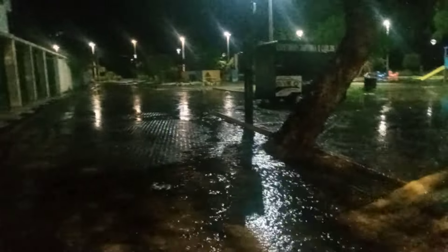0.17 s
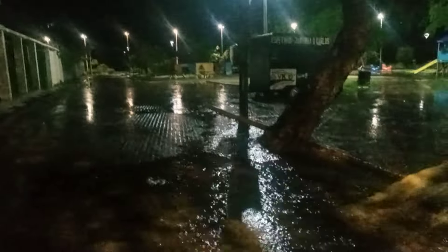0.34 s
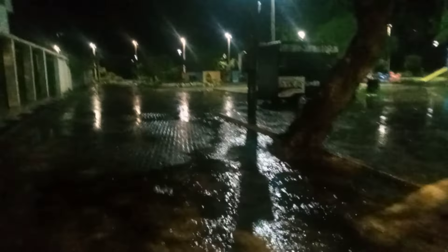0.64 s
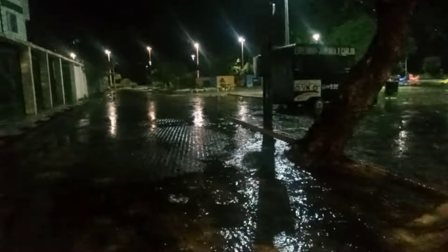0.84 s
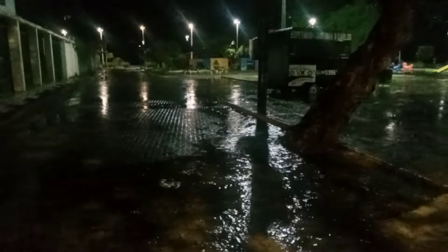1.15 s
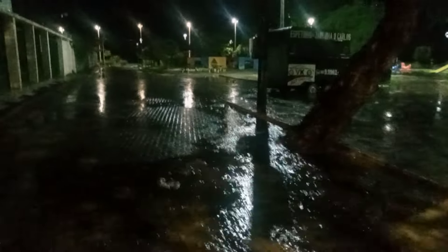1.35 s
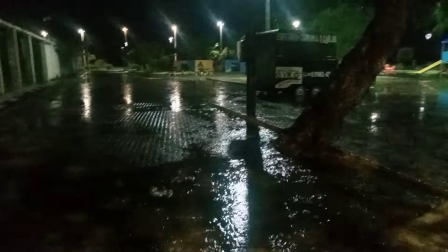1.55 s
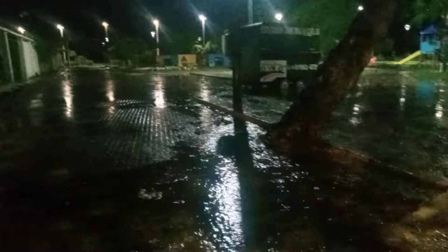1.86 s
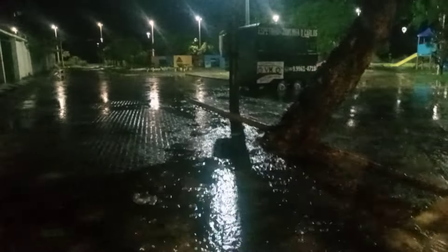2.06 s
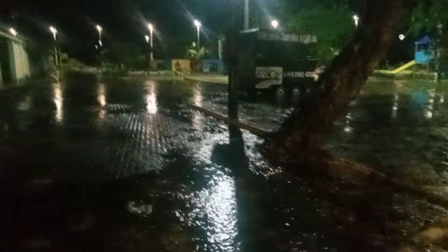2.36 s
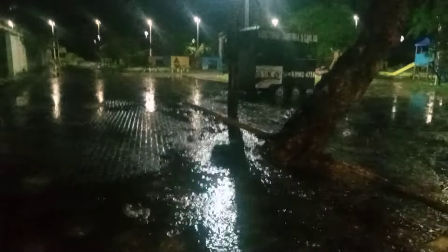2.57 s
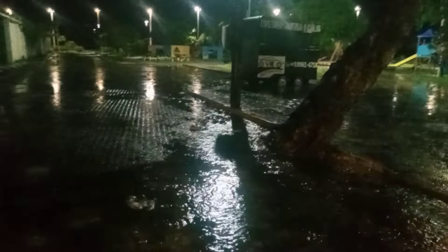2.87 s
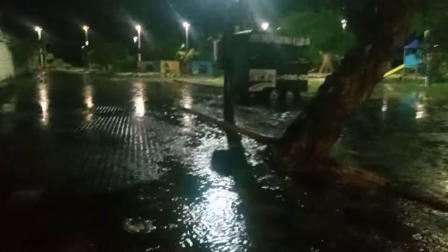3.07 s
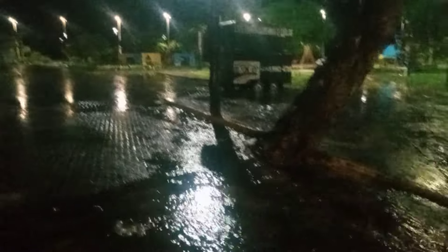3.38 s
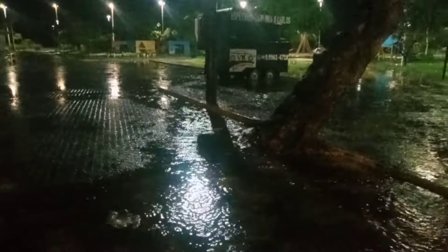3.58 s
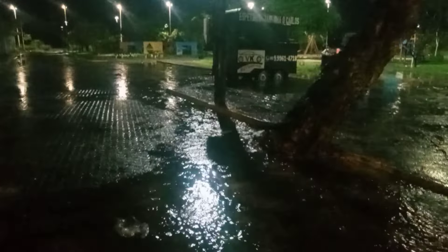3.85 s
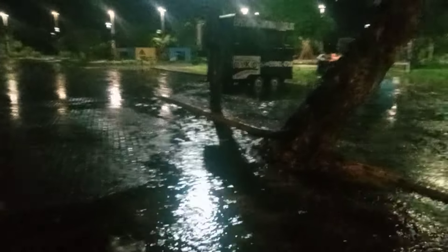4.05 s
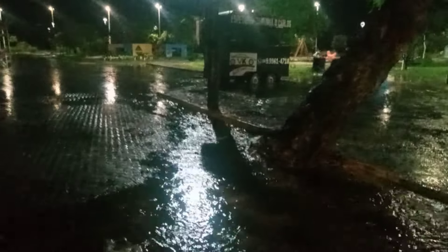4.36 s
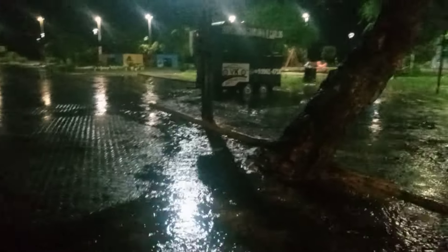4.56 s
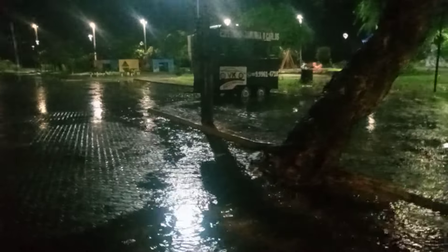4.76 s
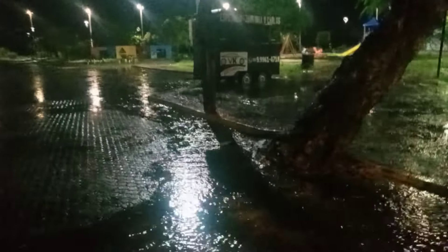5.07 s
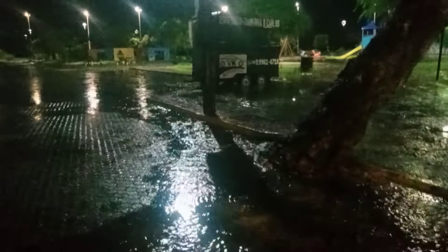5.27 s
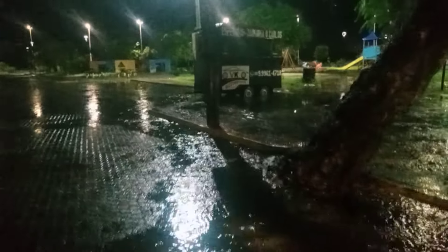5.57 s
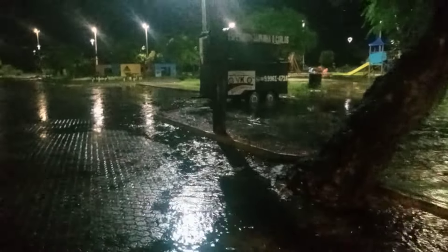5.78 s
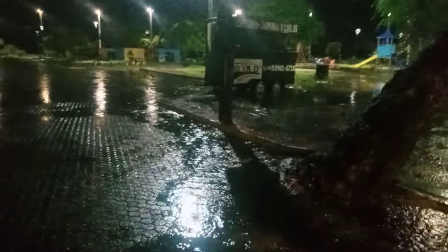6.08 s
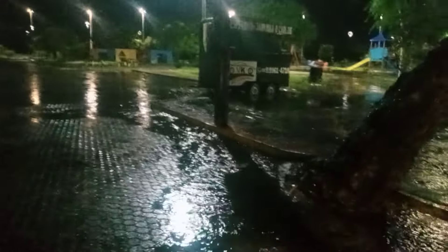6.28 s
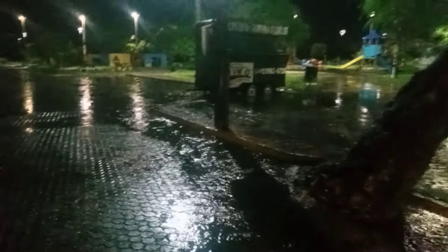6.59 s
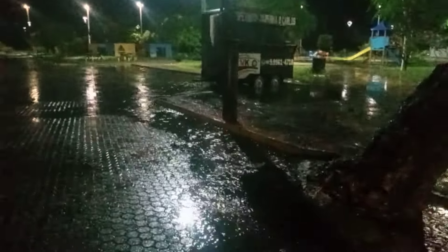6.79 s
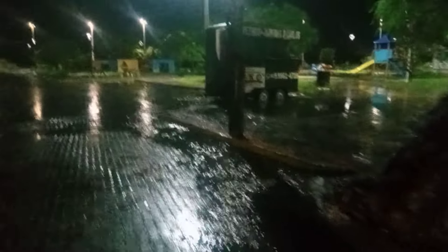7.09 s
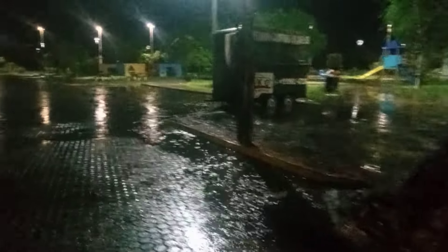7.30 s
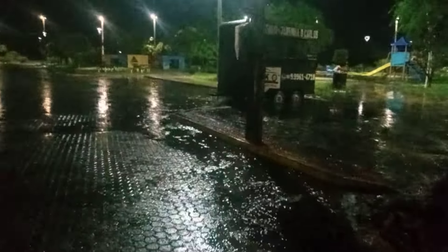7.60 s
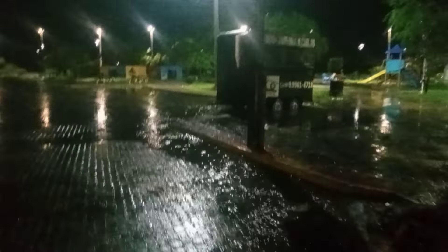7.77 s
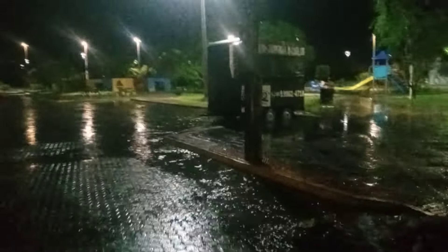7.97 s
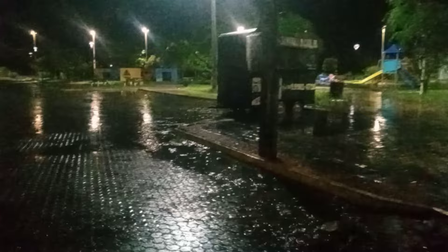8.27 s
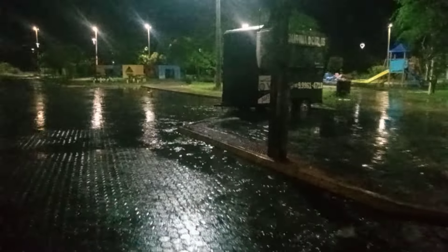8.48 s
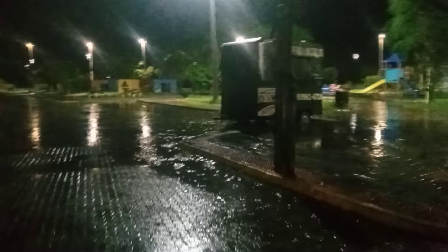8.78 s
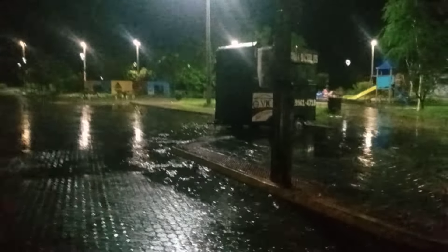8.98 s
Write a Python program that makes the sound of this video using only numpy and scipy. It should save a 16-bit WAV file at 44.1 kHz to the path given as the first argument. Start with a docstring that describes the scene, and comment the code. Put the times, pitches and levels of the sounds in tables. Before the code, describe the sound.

Close under an umbrella at night, heavy raindrops thud and slap irregularly on taut cloth, with lighter patter between. Behind, steady rain hisses and trickles on wet paving and puddles. Slow steps splash in shallow water, more often after seven seconds, as the overhead drumming thins out and stops. Small drips plink with rising pitch, and nearby droplets crack brightly.

```python
"""Heavy drops thud on the taut cloth of an umbrella just overhead, among many lighter ones, in steady rain.
Each drop is a filtered slap with an echo, scattered noise, ringing panel modes and a noise tick.
Slow steps splash in standing water: swelling and fading bursts of bubble and spray grains.
Drips plink as damped sines of rising pitch, and close droplets crack as decaying noise.
Behind, the street hisses as filtered noise and grains; one low rumble passes briefly."""
import sys
import numpy as np
from scipy import signal
from scipy.fft import rfft, irfft, next_fast_len
from scipy.io import wavfile
from scipy.ndimage import map_coordinates

SR = 44100
rng = np.random.default_rng(int(sys.argv[2]) if len(sys.argv) > 2 else 0)


def transcribe(u):
    """Save the signal u as a 16-bit wav file named by the first command-line argument.

    u: samples, shape (n,) or (channels, n), limited to [-1, 1]; the rate is SR.
    q: integer samples, one column per channel.
    """
    v = np.clip(np.atleast_2d(u).T, -1, 1)
    q = np.round(v * 32767).astype(np.int16)
    wavfile.write(sys.argv[1], SR, q)


N = 403074
TOP_HZ = 15800  # upper band limit


def amp(db):
    """Decibels to gain."""
    return 10 ** (np.asarray(db) / 20)


def unit(x):
    """Scale to rms 1."""
    return x / np.sqrt(np.mean(x ** 2) + 1e-20)


def gain(points, hz):
    """Gain of (frequency [Hz], level [dB]) points joined on a log frequency axis."""
    point_hz, point_db = np.transpose(points)
    return amp(np.interp(np.log(hz + 1), np.log(point_hz + 1), point_db))


def curves(rows):
    """One value per sample for each column after the time."""
    knot_s, *columns = np.transpose(rows)
    return [np.interp(np.arange(N) / SR, knot_s, column) for column in columns]


def wobble(knots_per_s):
    """Smooth random curve through normally distributed knots."""
    knots = rng.standard_normal(int(N * knots_per_s / SR) + 4)
    return map_coordinates(knots, [np.arange(N) * knots_per_s / SR])


def filtered(x, response):
    """Multiply the spectrum of x by a response of frequency."""
    size = next_fast_len(len(x) + SR // 5)
    spectrum = rfft(x, size) * response(np.fft.rfftfreq(size, 1 / SR))
    return irfft(spectrum, size)[:len(x)]


def coloured(x, points):
    """Filter x by the given spectrum, then scale to rms 1."""
    return unit(filtered(x, lambda hz: gain(points, hz)))


def causal(gains):
    """Minimum-phase responses, by folding the cepstrum, from rows of gains."""
    cepstrum = irfft(np.log(np.maximum(gains, 1e-6)))
    half = cepstrum.shape[-1] // 2
    cepstrum[..., 1:half] *= 2
    cepstrum[..., half + 1:] = 0
    return np.exp(rfft(cepstrum))


def placed(start_s, sounds):
    """Sum rows of samples, each from its start time."""
    first = np.round(np.maximum(start_s, 0) * SR).astype(int)
    at = first[:, None] + np.arange(sounds.shape[1])
    return np.bincount(at.ravel(), sounds.ravel(), N)[:N]


def grains(count, pitch_hz, log_scatter, cycles, spread_db, size):
    """Tiny impacts and bubbles: damped sines at random times, a few much nearer than the rest."""
    when, near, sign = rng.random((count, 3)).T
    hz = pitch_hz * np.exp(log_scatter * rng.standard_normal((count, 1)))
    turns = np.clip(hz, 300, TOP_HZ) * np.arange(size) / SR
    strength = amp(-spread_db * np.log(1 - .99 * near)) * np.sign(sign - .5)
    rings = np.sin(2 * np.pi * turns) * np.exp(-turns / cycles)
    return unit(placed(when * N / SR, strength[:, None] * rings))


# slap spectrum at SLAP_HZ pitch: (frequency [Hz], relative level [dB per Hz])
SLAP_SPECTRUM = [(30, -23), (100, -48), (220, -8.5), (420, 3.5), (620, 1), (900, 1.5), (1350, -7),
                 (1900, -7.5), (2700, -20), (4000, -20), (6000, -22), (16000, -81)]
# spectrum scattered by the cloth: (frequency [Hz], relative level [dB per Hz])
CREASE_SPECTRUM = [(40, -37), (150, 15), (350, 16.5), (1000, 1.5), (2000, 10.5), (4000, -1), (6500, -6.5),
                   (16000, -27)]
# cloth panel modes at mean tautness: (frequency [Hz], relative level [dB], t60 [s])
PANEL_MODES = [(140, -42, .09), (270, -27, .07), (335, -23, .08), (380, -24, .085), (430, -21, .1),
               (540, -25, .055), (690, -27, .045), (825, -17, .03), (950, -20, .025), (1085, -23, .025)]
SLAP_HZ, SLAP_S = 1000, .004  # reference pitch; span over which a slap has rms 1
TICK_T60_S = .011


def cloth(start_s, level_db, pitch_hz, ring_db, crease_db, crease_t60_s, lag_hz, rib_db, rib_s, tick_db,
          size=3072):
    """Drops on the canopy: a slap, its return from the ribs, scattered waves, ringing panels and a wet tick."""
    t, hz, count = np.arange(size) / SR, np.fft.rfftfreq(size, 1 / SR), len(start_s)
    # every spot of the canopy has its own colour
    ripples = np.cos(np.pi * np.outer(np.arange(3, 9), np.log(hz + 200) / np.log(20)))
    spot = amp(1.8 * rng.standard_normal((count, len(ripples))) @ ripples)

    # smaller, faster drops slap shorter and higher; all-pass lag delays the lows
    lag = (lag_hz - 1j * hz) / (lag_hz + 1j * hz)
    slap_gain = spot * gain(SLAP_SPECTRUM, hz * SLAP_HZ / pitch_hz[:, None])
    slap = irfft(causal(slap_gain) * lag ** 2)
    slap *= np.sqrt(SLAP_S * SR) / np.linalg.norm(slap, axis=1, keepdims=True)

    trip_s = rib_s * (.5 + rng.random((count, 1)))
    echo = amp(rib_db) * irfft(rfft(slap) * np.exp(-2j * np.pi * hz * trip_s))

    noise = rng.standard_normal(count * size)
    scattered = coloured(noise, CREASE_SPECTRUM).reshape(count, size)
    scattered *= amp(crease_db - 60 * t / crease_t60_s) * (1 - np.exp(-t / 0.00033))

    # each blow weights the modes at random; tautness scales pitch and decay rate
    mode_hz, mode_db, t60_s = np.transpose(PANEL_MODES)[:, :, None]
    modes = amp(ring_db + mode_db - 60 * t / t60_s) * np.sin(2 * np.pi * mode_hz * t)
    blows = rng.standard_normal((count, len(PANEL_MODES))) @ modes
    tautness = np.exp(.1 * rng.standard_normal(count))
    ring = np.array([np.interp(t * k, t, blow, right=0) for k, blow in zip(tautness, blows)])

    # the burst varies with the film of water that the drop meets
    burst_db = tick_db - 12 * rng.random((count, 1))
    tick = amp(burst_db - 60 * t / TICK_T60_S) * rng.standard_normal((count, size))

    drum = placed(start_s, amp(level_db)[:, None] * (slap + echo + scattered + ring + tick))
    # low-frequency air slips round the open canopy and radiates little
    highpass = signal.butter(2, 140, "highpass", fs=SR, output="sos")
    return signal.sosfilt(highpass, drum)


# heaviest drops on the cloth: (time [s], slap level [dB], slap pitch [Hz])
HEAVY_DROPS = [(0.0589, -23, 980), (0.162, -28, 1150), (0.1923, -26.0, 1180), (0.245, -24.5, 1000),
               (0.3045, -24, 750), (0.5024, -23.5, 860), (0.5386, -24.5, 1400), (0.822, -19.0, 840),
               (0.8931, -21, 890), (0.9542, -20, 750), (0.9722, -16.5, 845), (1.0414, -16, 780),
               (1.0992, -22, 1050), (1.2502, -22.5, 734), (1.2863, -16.5, 770), (1.3303, -22.5, 1050),
               (1.3409, -19.0, 880), (1.4882, -19.0, 890), (1.5229, -21.5, 1140), (1.589, -22, 1180),
               (1.6057, -18, 960), (1.6827, -26, 870), (1.7025, -15.5, 816), (1.7282, -16, 840),
               (1.7556, -22.5, 905), (1.7786, -24, 910), (1.9933, -20, 710), (2.0142, -18, 1080),
               (2.0428, -16, 694), (2.0654, -36, 710), (2.2118, -16.5, 905), (2.2506, -22.5, 990),
               (2.3066, -25, 980), (2.3822, -18, 756), (2.3973, -17.5, 960), (2.4227, -21, 1170),
               (2.6178, -25.5, 1090), (2.6738, -14, 526), (2.7022, -23, 1020), (2.7326, -19.5, 1060),
               (2.7873, -23, 860), (2.8947, -17.5, 1000), (2.9349, -18.5, 1030), (2.9611, -15, 805),
               (3.2296, -22.5, 970), (3.2754, -18.5, 1500), (3.3236, -18, 796), (3.5993, -20, 1250),
               (3.6143, -21, 1140), (3.6939, -20, 690), (3.7262, -17.5, 710), (3.7677, -24, 1110),
               (3.7902, -14, 790), (3.829, -19.5, 1000), (3.841, -24.5, 940), (3.899, -20, 960),
               (3.9377, -21.5, 820), (3.9894, -23.5, 920), (4.0053, -19.5, 890), (4.1262, -22.5, 950),
               (4.1503, -15.0, 880), (4.221, -22.5, 1250), (4.3399, -18.5, 930), (4.7583, -18, 910),
               (4.8073, -28, 790), (4.8229, -16.5, 905), (4.866, -21.5, 1260), (4.9283, -16, 930),
               (5.04, -14.0, 875), (5.1163, -25.5, 1030), (5.1531, -16, 820), (5.1621, -17.5, 600),
               (5.2309, -17.5, 960), (5.2579, -15, 1000), (5.3141, -16.0, 820), (5.4028, -27, 1600),
               (5.4358, -19.5, 1000), (5.4484, -17, 1020), (5.5448, -14.5, 710), (5.6065, -18, 1060),
               (5.7086, -16, 704), (5.823, -20.5, 1040), (5.989, -20, 834), (6.0048, -19.5, 870),
               (6.0504, -26.5, 1000), (6.0726, -21.5, 910), (6.0932, -16.5, 1070), (6.133, -22, 1520),
               (6.1751, -14, 970), (6.3201, -15.5, 1050), (6.3931, -21.5, 1010), (6.4081, -16.5, 740),
               (6.565, -25, 720), (6.6703, -20.5, 1140), (6.7208, -15.5, 890), (6.9028, -16.5, 1040),
               (7.0212, -31, 1050), (7.1254, -17.5, 1090), (7.1417, -20, 850), (7.3688, -20, 980),
               (7.4194, -16.5, 736), (7.7567, -17, 950), (7.8017, -19.5, 1620), (7.8439, -22, 1220),
               (7.9896, -20.5, 980), (8.104, -24, 2100), (8.3036, -25, 1280)]


def heavy_drops():
    """Fat drops strike the cloth right above the microphone."""
    start_s, level_db, pitch_hz = np.transpose(HEAVY_DROPS)
    return cloth(start_s, level_db, pitch_hz, ring_db=10, crease_db=-8, crease_t60_s=.05,
                 lag_hz=1000, rib_db=-11, rib_s=.008, tick_db=-9)


# lighter dripping on the cloth: (time [s], level [dB])
PATTER_LEVEL = [(0, -78), (.43, -33.5), (.72, -54.5), (1.02, -32), (1.35, -41), (1.73, -29), (2.9, -40),
                (3.85, -33), (4.6, -38.5), (5.15, -30.5), (5.75, -42.5), (6.11, -36.5), (6.7, -38),
                (7.12, -33), (7.55, -68), (7.97, -36.5), (8.8, -78), (9.14, -36.5)]


def light_drops(count=340, range_db=12):
    """Ordinary raindrops patter on the cloth; smaller drops tap softer and tend to tap higher."""
    when, small = rng.random((count, 2)).T
    pitch_hz = 1000 * np.exp(.4 * small + .25 * rng.standard_normal(count))
    start_s = (np.arange(count) + 2 * when) / count * N / SR  # jittered even spacing
    taps = cloth(start_s, -range_db * small, pitch_hz, ring_db=12, crease_db=-6, crease_t60_s=.05,
                 lag_hz=1500, rib_db=-13, rib_s=.008, tick_db=-9)
    return amp(curves(PATTER_LEVEL)[0]) * unit(taps)


# splashes, mostly underfoot, levels before the gains below:
# (time [s], length [s], slosh level [dB], spray level [dB])
SPLASHES = [(1.123, 0.026, -53, -40.5), (1.324, 0.047, -37.5, -48), (2.062, 0.025, -38, -44.5),
            (2.383, 0.086, -56, -55), (3.086, 0.024, -35.5, -42.5), (3.257, 0.031, -35.5, -45),
            (3.838, 0.082, -43, -47.5), (4.675, 0.098, -39.5, -49), (5.463, .084, -41.5, -41.5),
            (5.57, 0.089, -39, -47), (5.813, 0.023, -36, -45), (6.374, 0.15, -44, -46),
            (6.966, 0.046, -39, -48), (7.207, 0.047, -32.5, -41.5), (7.288, 0.054, -41, -54),
            (7.353, 0.031, -33, -49.5), (7.731, 0.016, -30.5, -37.5), (7.9, 0.016, -34.5, -41.5),
            (7.972, 0.037, -35.5, -42.5), (8.103, 0.023, -28, -48), (8.422, 0.035, -32.5, -45),
            (8.49, 0.033, -36.5, -45), (8.69, .008, -36, -49), (8.739, .054, -48, -45),
            (8.802, 0.015, -34, -44)]
# slosh spectrum: (frequency [Hz], relative level [dB per Hz])
SLOSH_SPECTRUM = [(100, -37), (600, -33), (1200, -0.5), (2000, 11), (3600, 12.5), (5500, 16.5), (9000, -20),
                  (16000, -30)]
# spray spectrum, also the street hiss: (frequency [Hz], relative level [dB per Hz])
HISS_SPECTRUM = [(500, -34), (3000, 7.5), (5500, -2), (8000, 1.5), (11000, 1), (16000, 5)]
FALLBACK_DB, FALLBACK_S = -12.5, 0.084  # water raining back: level, exponential fading time


def splashes(slosh_gain_db=3, spray_gain_db=9.5):
    """Each splash swells, breaks up into a slosh of small bubbles and a fine spray, then rains back."""
    droplets = grains(count=7000, pitch_hz=2600, log_scatter=.5, cycles=3.2, spread_db=3.8, size=200)
    slosh = amp(slosh_gain_db) * coloured(droplets * amp(1.8 * wobble(160)), SLOSH_SPECTRUM)
    specks = grains(count=16000, pitch_hz=9500, log_scatter=.35, cycles=3, spread_db=3.8, size=64)
    spray = amp(spray_gain_db) * coloured(specks * amp(2.8 * wobble(120)), HISS_SPECTRUM)
    out = np.zeros(N)
    for start_s, length_s, slosh_db, spray_db in SPLASHES:
        first = int(max(start_s - length_s, 0) * SR)
        span = slice(first, min(int((start_s + .5) * SR), N))
        age_s = np.arange(N)[span] / SR - start_s
        swell = 1 / np.sqrt(1 + (2 * age_s / length_s - 1) ** 8)
        fading = np.exp(-np.abs(age_s - length_s) / FALLBACK_S)
        fallback = (age_s > length_s) * amp(FALLBACK_DB) * fading
        water = amp(slosh_db) * slosh[span] + amp(spray_db) * spray[span]
        out[span] += np.maximum(swell, fallback) * water
    return out


# nearest bubbles trapped by drips: (time [s], level before damping and fade-in [dB], pitch [Hz])
NEAR_BUBBLES = [(1.718, -17, 3420), (1.896, -15, 4550), (4.799, -18.5, 1640), (5.192, -16, 2070),
                (6.533, -16, 3470), (7.32, -20, 1720), (7.333, -19, 3850), (7.352, -7.5, 3150),
                (8.12, -16, 3100), (8.814, -11.5, 2860), (9.082, -23, 820)]
# lesser bubbles: loudest, range below it, median pitch, log pitch spread
BUBBLE_DB, BUBBLE_RANGE_DB, BUBBLE_HZ, BUBBLE_LOG_SPREAD = -21, 8, 2700, .33


def plinks(life_cycles=8, lesser_cycles=6, rise=0.077, count=80, size=2048):
    """Trapped bubbles ring and climb in pitch as they near the surface; lesser, shorter ones are random."""
    when, far = rng.random((count, 2)).T
    lesser_hz = BUBBLE_HZ * np.exp(BUBBLE_LOG_SPREAD * rng.standard_normal(count))
    lesser = [when * N / SR, BUBBLE_DB - BUBBLE_RANGE_DB * far, lesser_hz]
    start_s, level_db, hz = np.hstack([np.transpose(NEAR_BUBBLES), lesser])
    turns = hz[:, None] * np.arange(size) / SR
    cycles = np.repeat([life_cycles, lesser_cycles], [len(NEAR_BUBBLES), count])
    lives = turns / cycles[:, None]
    # pitch climbs by the fraction rise over two lives, through hz at one
    tone = np.sin(2 * np.pi * turns * (1 + rise * (lives / 2 - 1) / 2))
    ring = tone * np.exp(-lives) * (1 - np.exp(-turns / 2))
    return placed(start_s, amp(level_db)[:, None] * ring)


# droplets bursting close by: (time [s], noise level at onset before filtering [dB])
NEAR_SPATTER = [(0.3252, -23), (1.1368, -20), (1.2862, -17), (3.096, -20), (3.157, -13), (3.7522, -16.5),
                (5.9875, -18), (7.231, -22), (8.092, -11), (8.1369, -14), (9.0093, -18)]
SPATTER_DB, SPATTER_RANGE_DB = -21, 8  # lesser droplets: loudest, range below it
CRACK_T60_S = .009


def spatter(count=60, size=1024):
    """Droplets bursting near the microphone give short, bright noise cracks; farther ones tick at random."""
    when, far = rng.random((count, 2)).T
    lesser = [when * N / SR, SPATTER_DB - SPATTER_RANGE_DB * far]
    start_s, level_db = np.hstack([np.transpose(NEAR_SPATTER), lesser])
    decay_db = 60 * np.arange(size) / SR / CRACK_T60_S
    cracks = rng.standard_normal((len(start_s), size)) * amp(level_db[:, None] - decay_db)
    brightness = [(200, -35), (1500, -10), (4000, -5), (16000, -0.5)]  # (Hz, dB)
    return filtered(placed(start_s, cracks), lambda hz: gain(brightness, hz))


# street rain, base levels: (time [s], puddle level [dB], hiss level [dB])
STREET_LEVELS = [(0, -41, -40), (1.3, -40.5, -40.5), (2.2, -38.5, -40.5), (3.7, -39, -40),
                 (5.6, -38, -41.5), (6.85, -41, -40.5), (7.6, -43.5, -41.5), (7.97, -38, -36.5),
                 (8.27, -43.5, -41), (9.14, -42, -39)]
# puddle spectrum: (frequency [Hz], relative level [dB per Hz])
PUDDLE_SPECTRUM = [(30, -45), (100, -8), (220, 3.5), (500, 8), (1000, 6.5), (2000, 6), (3600, 1.5),
                   (5000, 5), (8000, -0.5), (16000, -32)]


def street():
    """Countless drops on paving and puddles: far ones merge to a wash, near ones tick, plip and fizz."""
    puddle_db, hiss_db = curves(STREET_LEVELS)
    wash = coloured(rng.standard_normal(N), PUDDLE_SPECTRUM)
    ticks = grains(count=9000, pitch_hz=2400, log_scatter=.6, cycles=2, spread_db=3.6, size=160)
    plips = grains(count=420, pitch_hz=2900, log_scatter=.27, cycles=7, spread_db=2.4, size=800)
    near = coloured(ticks, PUDDLE_SPECTRUM) + amp(-6.5) * plips
    near *= amp(-3.5 + 1.5 * wobble(45))
    water = amp(puddle_db + 2.3 * wobble(13)) * (amp(-4.0) * wash + near)
    # level wobble clusters the specks of spray
    specks = grains(count=16000, pitch_hz=10500, log_scatter=.35, cycles=2, spread_db=3.8, size=64)
    fizz = amp(-3.5 + 3.8 * wobble(50)) * coloured(specks, HISS_SPECTRUM)
    hiss = coloured(rng.standard_normal(N), HISS_SPECTRUM)
    return water + amp(hiss_db + 0.83 * wobble(11.0)) * (amp(-1.0) * hiss + fizz)


RUMBLE_S, RUMBLE_WIDTH_S, RUMBLE_DB = 5.95, .07, -39  # middle, half width at 1/e, peak rms level


def rumble():
    """One brief low rumble: low-passed noise under a Gaussian envelope."""
    spectrum = [(20, -28), (55, -9), (95, 0), (170, -2), (260, -20), (800, -70)]  # (Hz, dB)
    low = coloured(rng.standard_normal(N), spectrum)
    envelope = np.exp(-((np.arange(N) / SR - RUMBLE_S) / RUMBLE_WIDTH_S) ** 2)
    return amp(RUMBLE_DB) * envelope * low


def scene():
    """Umbrella overhead, puddles and street around."""
    overhead = heavy_drops() + light_drops()
    around = splashes() + plinks() + spatter() + street() + rumble()
    return (overhead + around)[None]


# microphone response: (frequency [Hz], gain [dB])
MICROPHONE_RESPONSE = [(25, -30.5), (50, -7), (75, -8.5), (110, -7), (3900, 2.5), (5400, -5), (6700, -6),
                       (7500, 0), (8300, 2.5), (9300, -2.5), (11000, -3), (12800, -1.5), (14200, -4),
                       (15600, -3)]


def record(dry):
    """A small microphone with a treble resonance; high peaks are rounded off and the band is limited."""
    x = filtered(dry[0], lambda hz: gain(MICROPHONE_RESPONSE, hz))
    x = x / (1 + np.abs(x / .55) ** 4) ** (1 / 4)  # soft ceiling at .55
    return filtered(x, lambda hz: hz < TOP_HZ)[None]


dry = scene()
out = record(dry)
transcribe(out)
```